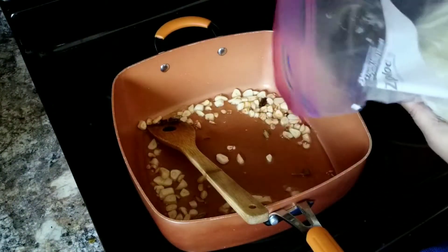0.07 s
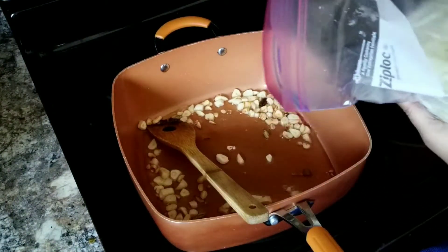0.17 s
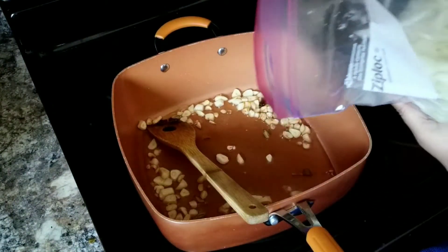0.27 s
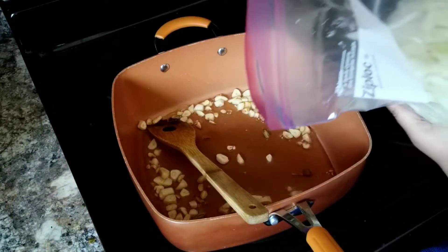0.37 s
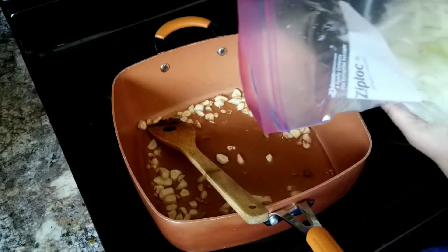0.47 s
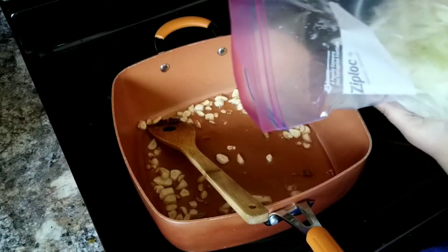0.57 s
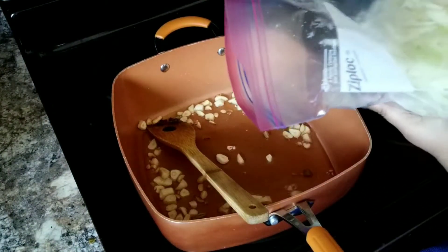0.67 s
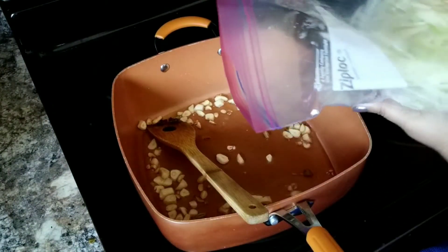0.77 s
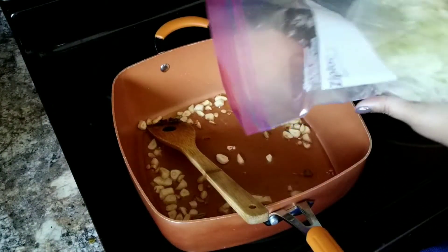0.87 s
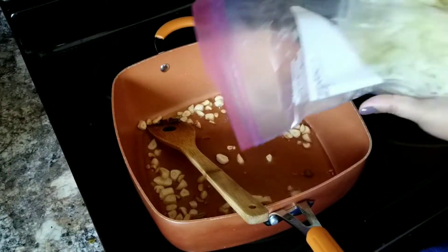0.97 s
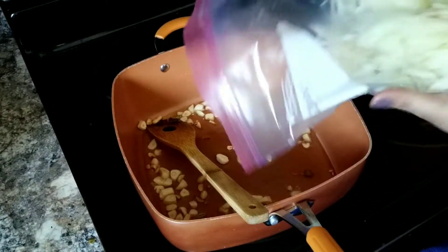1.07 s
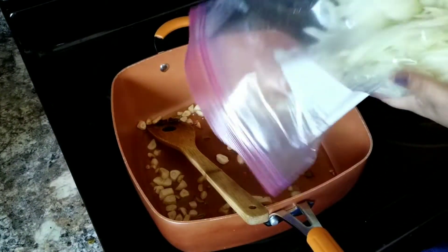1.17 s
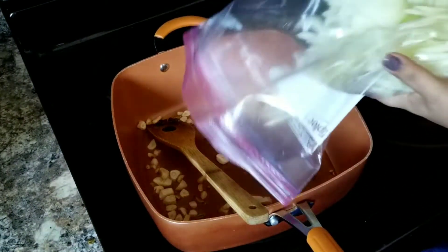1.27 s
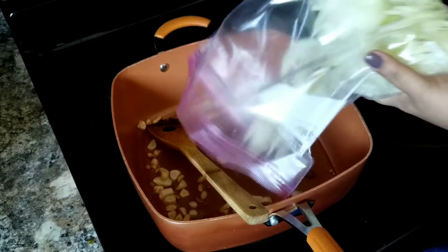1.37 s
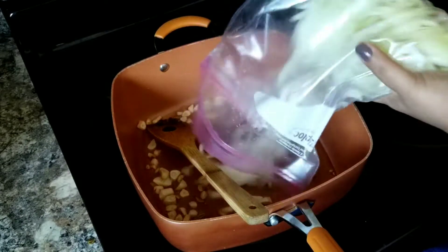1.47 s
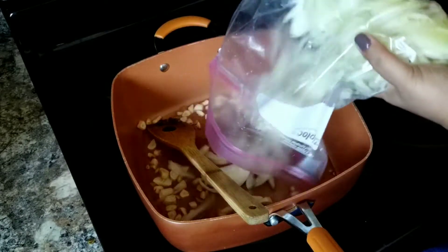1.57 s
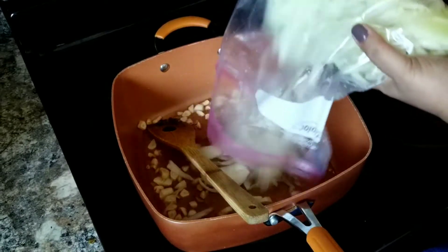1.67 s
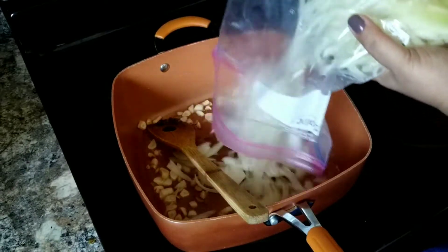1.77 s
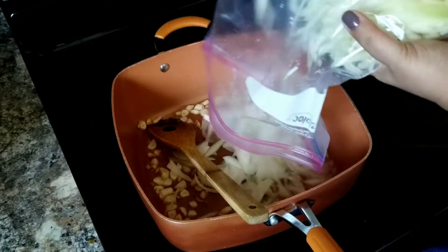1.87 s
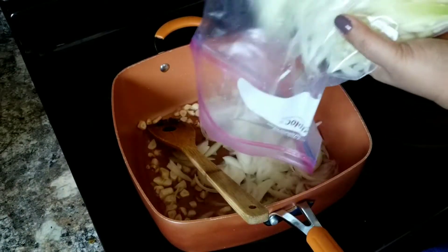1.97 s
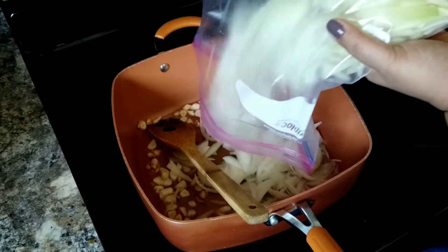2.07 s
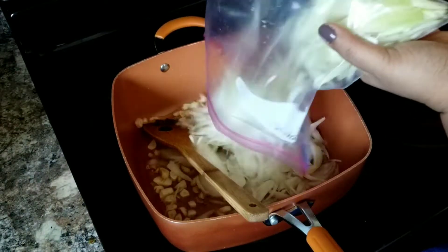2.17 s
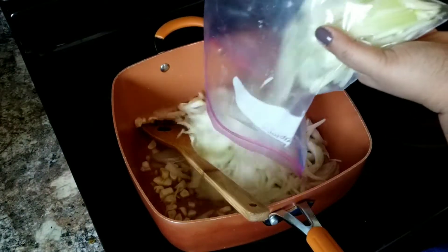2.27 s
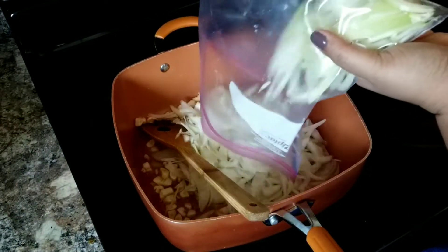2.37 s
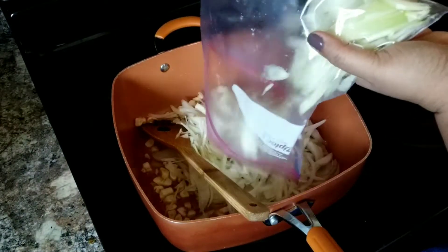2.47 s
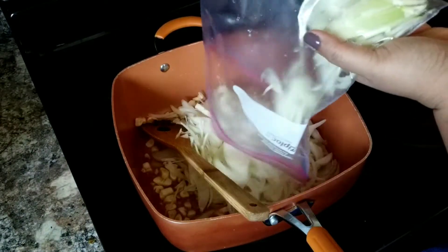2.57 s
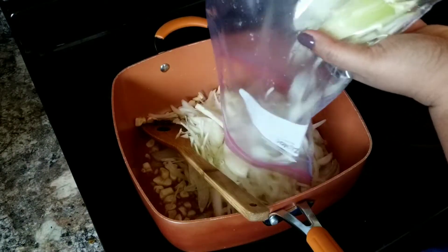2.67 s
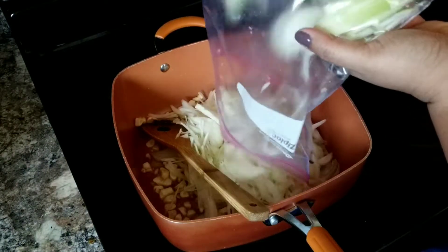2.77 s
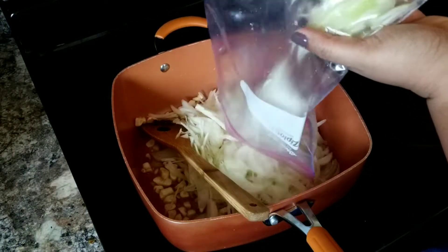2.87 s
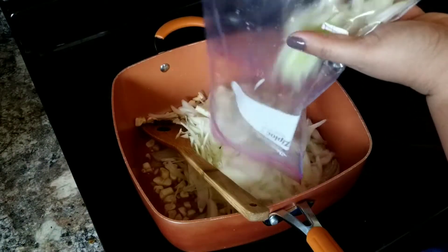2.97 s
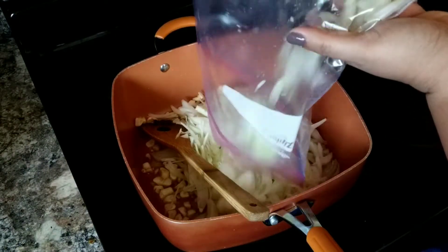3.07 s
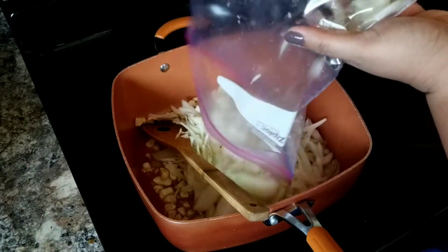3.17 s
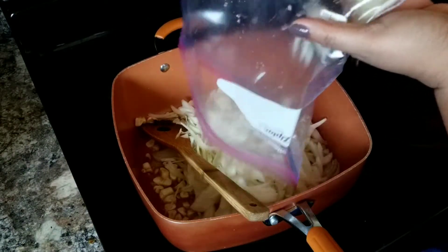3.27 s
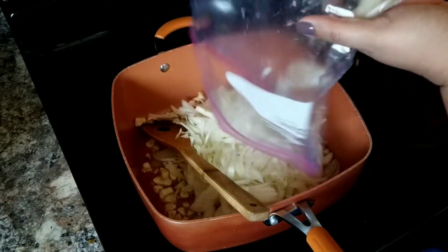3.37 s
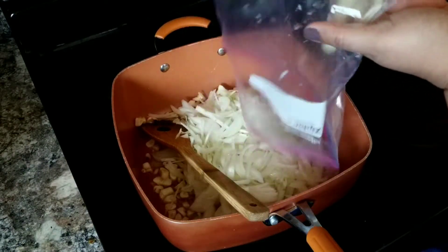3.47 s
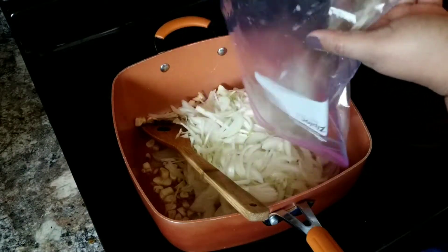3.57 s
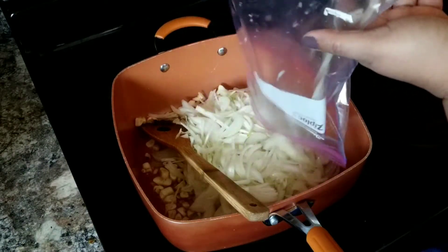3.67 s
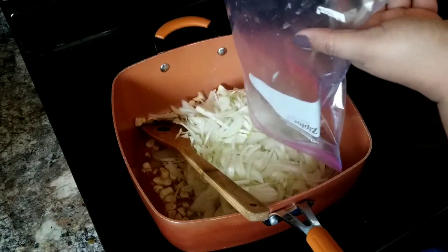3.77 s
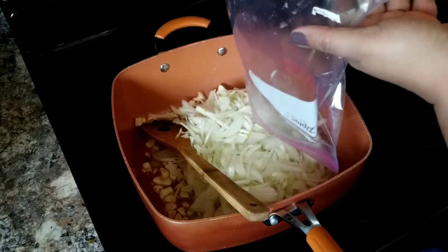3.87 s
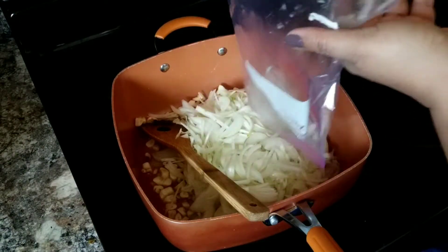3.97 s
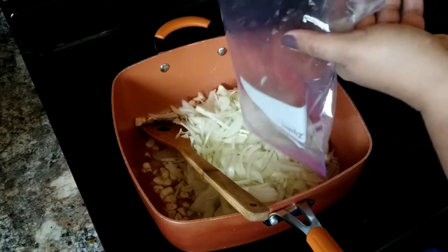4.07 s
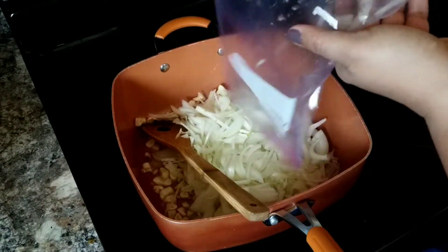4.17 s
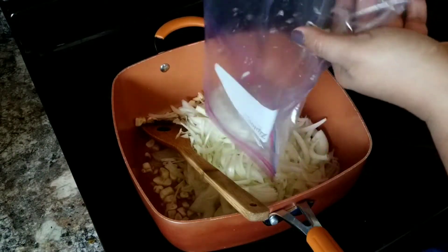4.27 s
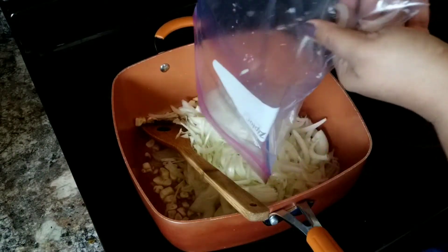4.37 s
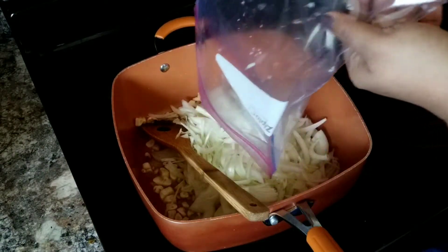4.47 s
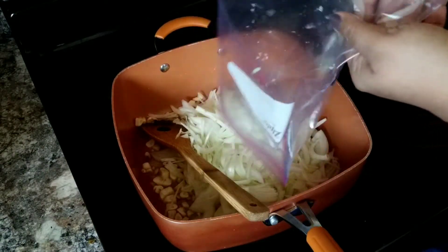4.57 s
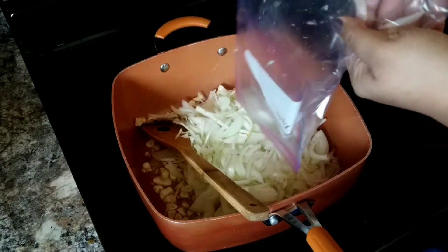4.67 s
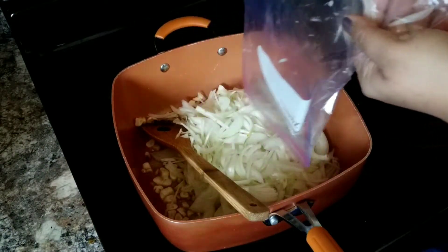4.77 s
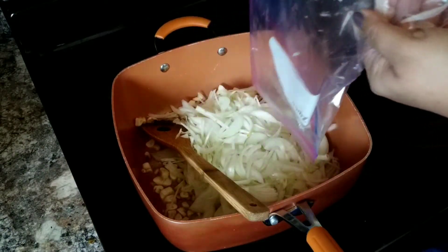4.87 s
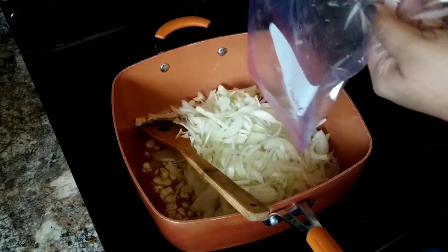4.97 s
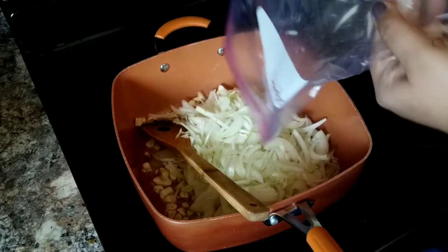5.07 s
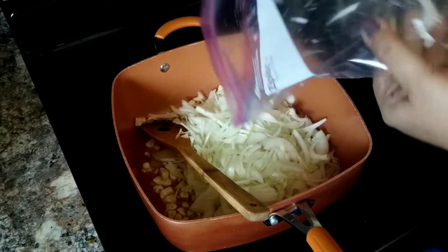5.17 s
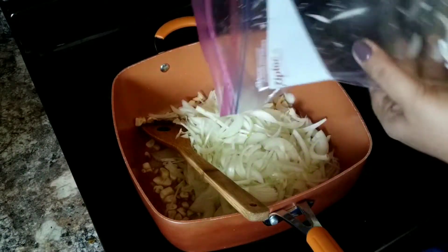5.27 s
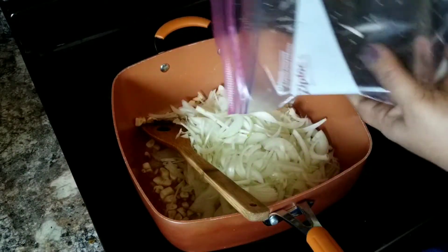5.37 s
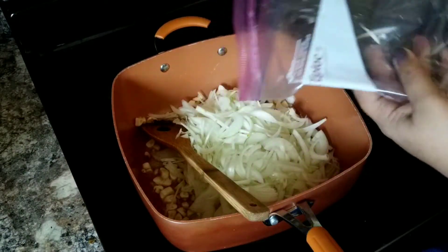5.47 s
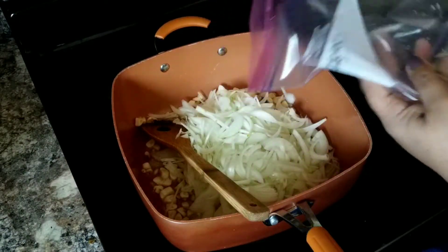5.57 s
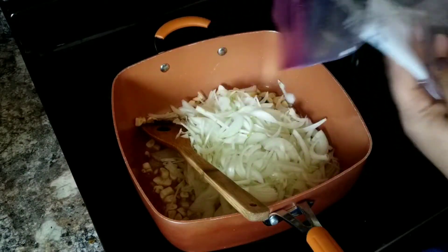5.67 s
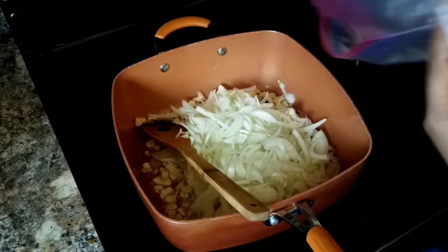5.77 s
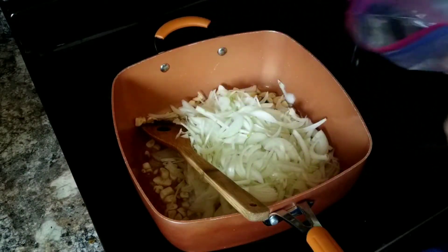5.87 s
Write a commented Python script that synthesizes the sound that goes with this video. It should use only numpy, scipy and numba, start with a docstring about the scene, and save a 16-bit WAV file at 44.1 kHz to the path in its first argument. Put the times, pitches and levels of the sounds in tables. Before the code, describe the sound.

A close, wide stereo phone recording in a small kitchen with a very short room tail. At first there is a quiet fine fizz of hot oil over a low, steady appliance hum and soft air. A plastic bag crinkles briefly at 0.1 seconds and again at 0.6 to 1.2, with wet slices shifting inside and one small spit at 1.0. From about 1.4 seconds clumps of onion land with soft, dull thuds; at 1.5 the oil flares into a short fierce hiss with dense, bright spits until 1.9. Another heavy clump drops at 2.2, with more spits around 2.1 and 2.5. The sizzle settles and sinks through 3 to 4.5 seconds while the bag is shaken, rustling and snapping. From 4.7 the level partly recovers: a last soft thud and scuff, then the loudest sharp film cracks at 5.0 to 5.35, and a final snap near 5.8 over steady sizzling.

```python
"""Onions into hot oil

Sliced onions are shaken from a plastic bag into a pan of hot oil, close to a phone in a small kitchen.
Swarms of tiny rings fizz and crackle as the oil, flare up as wet slices land, then settle to a sizzle.
Filtered ticks and noise bursts make the rustling bag and the spits; damped low sines make the thuds.
Sines and soft noise make a nearby appliance. All but the sharp snaps and spits sinks after the
first flare and partly comes back about three seconds later."""
import sys
import numpy as np
from scipy import signal
from scipy.fft import rfft, irfft, next_fast_len
from scipy.io import wavfile
from numba import njit

SR = 44100
rng = np.random.default_rng(int(sys.argv[2]) if len(sys.argv) > 2 else 0)


def generate_wav(signal):
    """Clip the signal to [-1, 1] and save it as 16-bit WAV at the path in sys.argv[1]."""
    frames = np.transpose(np.atleast_2d(signal))
    scaled = np.clip(frames, -1, 1) * 32767
    pcm = np.round(scaled).astype(np.int16)
    wavfile.write(sys.argv[1], SR, pcm)


N = 261513  # length in samples

# spectrum of crumpling plastic film: frequency_hz, level_db
FILM_SPECTRUM = [(1100, -11), (1500, -0.5), (2200, 0.5), (3500, -1.5), (7000, -17), (14000, -32)]
# spectrum of wet slices sliding on the film: frequency_hz, level_db
SLIDE_SPECTRUM = [(190, -7), (450, 3), (720, 2.5), (950, 6), (1080, 7.5), (1230, 0.5), (1600, -1),
                  (4000, -23)]
FLARE_RISE_S = 0.011


def undb(db):
    """Decibels to gain."""
    return 10 ** (np.asarray(db) / 20)


def unit(x):
    """Scale to rms 1."""
    return x / np.sqrt(np.mean(x ** 2))


def pan(db):
    """Channel gains for a left minus right level."""
    return undb(np.array([[db], [-db]]) / 2)


def add(out, s, sound):
    """Mix a stereo sound in at time s."""
    start = int(s * SR)
    out[:, start:start + sound.shape[1]] += sound[:, :N - start]


def swell(s, rise_s, hold_s, fall_s):
    """An envelope that rises from time s, holds until hold_s after it, then decays with time constant fall_s."""
    t = np.arange(N) / SR - s
    rise = np.clip(t / rise_s, 0, 1)
    return rise * np.exp(-np.maximum(t - hold_s, 0) / fall_s)


def colour(x, points):
    """Causal minimum-phase filter with the given (Hz, dB) outline, rolled off below its first point."""
    size = 2 * next_fast_len(x.shape[-1] // 2 + 2048, real=True)
    hz, db = np.transpose(points)
    f = np.maximum(np.fft.rfftfreq(size, 1 / SR), 1)
    low_cut = np.clip(f / hz[0], 1 / 20, 1) ** 2  # 12 dB an octave, down to a floor
    gain = undb(np.interp(np.log(f), np.log(hz), db)) * low_cut
    # folding the cepstrum onto positive times makes the filter causal
    cepstrum = irfft(np.log(gain), size)
    cepstrum[1:size // 2] *= 2
    cepstrum[size // 2 + 1:] = 0
    response = np.exp(rfft(cepstrum))
    return irfft(rfft(x, size) * response, size)[..., :x.shape[-1]]


@njit
def ring(start, hz, cycles, size):
    """Sum of damped sines, each of energy size squared and 60 dB down after its cycles."""
    out = np.zeros(N)
    for k in range(len(start)):
        fall = np.log(1000) * hz[k] / cycles[k] / SR
        step = -fall + 2j * np.pi * hz[k] / SR
        first = int(np.ceil(start[k] * SR))
        # begin between samples, at the exact start time
        z = size[k] * np.sqrt(4 * fall) * np.exp(step * (first - start[k] * SR))
        p = np.exp(step)
        for i in range(max(first, 0), min(first + int(7 / fall), N)):
            out[i] += z.imag
            z *= p
    return out


def grains(s, hz, cycles, size, pan_db, spread_s=.00012):
    """Tiny rings from scattered places: each reaches the two microphones at its own lag and given level."""
    settings = np.broadcast_arrays(s, hz, cycles, size, pan_db)
    s, hz, cycles, size, pan_db = (np.ravel(a) * 1. for a in settings)
    lag = spread_s * (0.39 + rng.standard_normal(len(s)))
    hz = np.clip(hz, 50, .42 * SR)
    cycles = np.maximum(cycles, .5)
    left = ring(s - lag / 2, hz, cycles, size * undb(pan_db / 2))
    right = ring(s + lag / 2, hz, cycles, size * undb(-pan_db / 2))
    return np.array([left, right])


def swarm(count, low_hz, high_hz, cycles, scatter_db, width_db):
    """Countless bursts at random moments, most of them tiny and a few strong."""
    when, pitch, length, strength, place = rng.random((count, 5)).T
    size = undb(-scatter_db * np.log(.001 + .999 * strength))
    hz = low_hz + (high_hz - low_hz) * pitch
    return grains(when * N / SR, hz, cycles * (.5 + length), size, width_db * (place - .5))


def wash(x, t60, db):
    """Reflections of bursts from ever new places blur into a hiss that follows their energy."""
    keep = np.exp(-2 * np.log(1000) / t60 / SR)
    energy = signal.lfilter([1 - keep], [1, -keep], np.mean(x ** 2, axis=0))
    return x + undb(db) * np.sqrt(energy) * rng.standard_normal(x.shape)


def flurries(count, t60, depth):
    """Bursts come in bunches: sudden surges of activity begin to die away at once."""
    when, strength = rng.random((count, 2)).T
    kicks = np.bincount((when * N).astype(int), strength, N)
    surge = signal.lfilter([1], [1, -np.exp(-np.log(1000) / t60 / SR)], kicks)
    return unit(1 + depth * unit(surge))


def snap(outline, tail_outline, break_s, tail_db, tail_s):
    """A sudden break of unit energy, plus a scatter tail_db relative to it that dies more slowly."""
    t = np.arange(SR // 8) / SR
    first, scatter = rng.standard_normal((2, 2, len(t)))
    first = first.mean(axis=0) + 0.29 * (first - first[::-1])  # partly alike at the two microphones
    first = unit(colour(first * np.exp(-t / break_s), outline))
    scatter = unit(colour(scatter * np.exp(-t / tail_s), tail_outline))
    return (first + undb(tail_db) * scatter) / np.sqrt(len(t))


def kitchen(x, wall_db, width):
    """The short tail of the room: decaying noise, mostly alike at both microphones when width is small."""
    t60_s = 0.16
    t = np.arange(SR // 2) / SR
    decay = np.exp(-np.log(1000) * t / t60_s) * (t > .003)
    mid, side = rng.standard_normal((2, len(t))) * decay
    tail = np.array([mid + width * side, mid - width * side])
    tail /= np.sqrt(np.sum(tail ** 2) / 2)
    return x + undb(wall_db) * signal.fftconvolve(x, tail, axes=1)[:, :N]


def boiling(oil_db, heap_db, flare_db, lag_s):
    """Strength of the bubbling: the bare oil, the heap from the first landing on, and each load's flare."""
    # loads of wet slices reach the oil and flare up: start_s, level_db, decay_time_constant_s
    loads = [(1.495, -28.5, 5.4), (1.52, -50, 0.096), (1.734, -30, 2.5), (2.2, -26, 0.27)]
    heap = undb(heap_db) * swell(loads[0][0] + lag_s, FLARE_RISE_S, N / SR, 1)
    power = undb(oil_db) ** 2 + heap ** 2
    for s, db, fall_s in loads:
        flare = undb(db + flare_db) * swell(s + lag_s, FLARE_RISE_S, FLARE_RISE_S, fall_s)
        power = power + flare ** 2
    return np.sqrt(power)


def frying():
    """Steam bubbles burst in the oil: very small ones fizz, larger ones crackle lower."""
    # spectrum of the fine fizz: frequency_hz, level_db
    fizz_spectrum = [(6500, -1.5), (8600, -7.5), (11000, -2), (13500, -4), (16000, -1)]
    # spectrum of the larger bubbles: frequency_hz, level_db
    crackle_spectrum = [(1800, -5), (2700, 3.5), (3600, 5), (5500, 4.5), (7100, 4), (8500, -6.5),
                        (12000, -35)]
    fizz_gain = boiling(oil_db=-40.5, heap_db=-38, flare_db=0, lag_s=0)
    # larger bubbles form later, and a flare drives them less than the fizz
    crackle_gain = boiling(oil_db=-47, heap_db=-35, flare_db=-4, lag_s=0.015)
    fizz = swarm(count=50000, low_hz=6980, high_hz=16800, cycles=26, scatter_db=2.0, width_db=32)
    crackle = swarm(count=36000, low_hz=1455, high_hz=8850, cycles=17.7, scatter_db=2.0, width_db=15.5)
    fizz = unit(colour(wash(fizz, t60=.08, db=0), fizz_spectrum))
    crackle = unit(colour(wash(crackle, t60=.08, db=0), crackle_spectrum)) * pan(0.85)
    sizzle = fizz_gain * fizz + crackle_gain * crackle
    return sizzle * flurries(count=500, t60=0.094, depth=0.17)


def appliance():
    """Mains harmonics and motor tones that waver slightly in phase, over a soft rush of air."""
    # tones of the hum: frequency_hz, level_db
    tones = [(120, -58.5), (180, -62), (240, -60.5), (300, -60), (354, -68.5), (431, -69)]
    # spectrum of the air: frequency_hz, level_db
    air_spectrum = [(20, -1), (60, 1), (85, 1), (140, 3.5), (220, 6), (330, -4), (600, -17), (1500, -7),
                    (6000, -22.5)]
    air_db, air_side_db = -55.5, -11.5  # side level is relative to the middle
    t = np.arange(N) / SR
    hum = 0
    for hz, db in tones:
        knots = np.arange(0, t[-1] + 1, 1 / 6)
        waver = np.interp(t, knots, rng.standard_normal(len(knots)))
        phase = 2 * np.pi * (hz * t + rng.random()) + 0.35 * waver
        hum = hum + np.sqrt(2) * undb(db) * np.sin(phase)
    mid, side = unit(colour(rng.standard_normal((2, N)), air_spectrum))
    air = undb(air_db) * (mid + undb(air_side_db) * np.array([[1], [-1]]) * side)
    return hum * pan(-2.4) + air


def bag_motion():
    """Strength of the crumpling and of the sliding: each move starts quickly, lasts a while and settles."""
    # lift, tip, pour, shake out, take away: start_s, length_s, film_level_db, slide_level_db
    moves = [(0.025, 0.018, -51.5, -54.5), (0.584, 0.2, -55.5, -58.5), (0.778, 0.037, -45.5, -50),
             (0.985, 0.19, -53, -51.5), (1.392, 0.065, -42, -46.5), (1.712, 1.66, -39.5, -50.5),
             (3.208, 0.35, -40.5, -50.5), (3.597, 1.04, -42, -53.5), (4.695, 0.051, -40, -52),
             (4.96, 0.98, -39, -51.5)]
    rise_s, settle_s = 0.021, 0.2
    held_db = (-66, -61.5)  # film and slices while the bag is only held
    power = undb(held_db)[:, None] ** 2
    for s, length_s, *levels_db in moves:
        move = undb(levels_db)[:, None] * swell(s, rise_s, length_s, settle_s)
        power = power + move ** 2
    return np.sqrt(power)


def handling(film_gain, slide_gain):
    """The film crumples in jerks of small ticks while wet slices rub and tumble more evenly inside it."""
    ticks = swarm(count=7000, low_hz=1210, high_hz=4630, cycles=4.0, scatter_db=1.5, width_db=-6)
    film = unit(colour(wash(ticks, t60=0.12, db=1.0), FILM_SPECTRUM))
    tumbles = swarm(count=9000, low_hz=150, high_hz=1670, cycles=1.9, scatter_db=1.3, width_db=20.5)
    slide = unit(colour(tumbles, SLIDE_SPECTRUM))
    jerks = flurries(count=400, t60=0.024, depth=0.42)
    sliding = slide_gain * np.sqrt(np.abs(jerks)) * slide  # the root evens out the jerks
    return film_gain * jerks * film + kitchen(sliding, wall_db=-6.0, width=0.67)


def small_creases(film_gain, count):
    """Lesser folds give way at random, as strongly as the bag is being crumpled: rows for creases()."""
    above_rustle_db, spread_db = 9, 6
    low_hz, high_hz = 1760, 5530
    when, strength, pitch, share = rng.random((count, 4)).T
    rustle_db = 20 * np.log10(film_gain[(when * N).astype(int)])
    db = rustle_db + above_rustle_db + spread_db * (strength - .5)
    hz = low_hz * (high_hz / low_hz) ** pitch
    return np.column_stack([when * N / SR, db, hz, share / 2])


def creases(rows):
    """Folds of the bag buckle one by one; each panel of film cracks and rings very briefly."""
    # spectrum of one snap: multiple_of_its_pitch, level_db
    crack_shape = [(.35, -4.5), (.65, 1), (1, 2.5), (1.7, -2.5), (2.6, -8), (9, -8.5)]
    # spectrum over all snaps: frequency_hz, level_db
    top_spectrum = [(300, -4), (7000, 1.5), (8700, -1), (15000, -4)]
    snap_db = 14.5  # energy of a snap relative to its nominal peak
    s, db, hz, share = np.transpose(rows)
    share = np.clip(share, 0, 1)
    size = undb(db + snap_db)
    out = grains(s, hz, 20, size * np.sqrt(share), 0, spread_s=.00003)
    for start, crack_size, pitch in zip(s, size * np.sqrt(1 - share), hz):
        outline = [(pitch * multiple, gain) for multiple, gain in crack_shape]
        crack = snap(outline, outline, break_s=.0011, tail_db=-6, tail_s=0.0086)
        add(out, start, crack_size * crack)
    return kitchen(colour(out, top_spectrum), wall_db=-4, width=0.34)


def rub(rise_s, crinkle_db):
    """A soft swell: slices scuff the film with unit energy, and it crinkles along."""
    t = np.arange(SR // 4) / SR
    mid, side, ticks = rng.standard_normal((3, len(t))) * t * np.exp(-t / rise_s)
    scuff = unit(colour(mid + 0.21 * side * np.array([[1], [-1]]), SLIDE_SPECTRUM))
    sparse = rng.standard_normal((2, len(t))) ** 3  # cubing leaves a few strong ticks
    crinkle = unit(colour(ticks * sparse, FILM_SPECTRUM))
    return (scuff + undb(crinkle_db) * crinkle) / np.sqrt(len(t))


def clumps():
    """Each clump lands as a few soft blows (a first slice, the bulk, then stragglers) and rubs along the film."""
    # clumps dropping: start_s, energy_of_main_blow_db, pitch_hz, rub_energy_db
    drops = [(0.808, -21.5, 353, -32), (1.428, -16, 182, -23), (1.513, -14, 345, -22),
             (1.675, -13.5, 440, -15.5), (2.197, -5.5, 450, -20), (2.52, -15, 457, -35),
             (2.659, -18, 181, -25), (3.069, -14, 191, -31), (4.73, -14, 180, -12)]
    blow_gap_s, blow_step_db = .011, -8  # the step is per place away from the bulk
    s, db, hz, _ = np.transpose(drops)[:, :, None]
    order = np.arange(4)
    wait, detune = rng.random((2, len(s), len(order))) - .5
    when = s + blow_gap_s * order * (1 + wait / 2)
    sizes = undb(db + blow_step_db * np.abs(order - 1))
    blows = grains(when, hz * 2 ** (0.17 * detune), 11, sizes, 0)
    out = signal.sosfilt(signal.butter(2, 150, "high", fs=SR, output="sos"), blows)
    for start, _, _, rub_db in drops:
        add(out, start - .01, undb(rub_db) * rub(rise_s=0.014, crinkle_db=-18))
    return kitchen(out, wall_db=-5, width=0.3)


def spits():
    """Drops of water explode in the oil, each followed by a short, bright hiss of steam."""
    # water spitting: start_s, energy_db, treble_tilt_db (above 8 kHz, before the energy is set)
    drops = [(1.034, -12, -3), (1.494, -5, 7), (1.552, 2.5, 7), (1.5826, 6, 16), (1.6265, 2.5, -8),
             (1.7758, -2, 2), (1.8001, -5.5, 4), (1.9161, -0.5, -4), (2.1425, 4.5, -7.5), (2.5226, 3.5, 9),
             (2.714, -10, 2), (3.345, -5, 2), (3.5568, -2.5, 10), (5.059, -4.5, 7), (5.2705, -14, 0),
             (5.5413, -2.5, 5)]
    # spectrum of the explosion: frequency_hz, level_db
    crack_spectrum = [(1800, 0.78), (3500, 3.5), (6500, 9.7), (8700, 6.4), (11500, 6.9), (15500, 10)]
    # spectrum of the steam: frequency_hz, level_db
    steam_spectrum = [(3400, 2.5), (5500, 12.5), (7000, 10), (8700, -3), (11500, 9.5), (15500, -4)]
    out = np.zeros((2, N))
    for s, db, treble_db in drops:
        crack = [(hz, gain + treble_db * (hz > 8000)) for hz, gain in crack_spectrum]
        hiss = [(hz, gain + treble_db * (hz > 8000)) for hz, gain in steam_spectrum]
        spit = snap(crack, hiss, break_s=0.00045, tail_db=-2.5, tail_s=0.0079)
        add(out, s, undb(db) * spit)
    return kitchen(out, wall_db=-5.0, width=0.41)


def scald():
    """The water on the first slices boils off all at once in a short, fierce hiss."""
    # spectrum of the hiss: frequency_hz, level_db
    hiss_spectrum = [(4000, -1), (5900, 8), (8500, -34)]
    steam = unit(colour(rng.standard_normal((2, N)), hiss_spectrum))
    return undb(-28.5) * swell(1.544, FLARE_RISE_S, hold_s=.04, fall_s=.028) * steam


def scene():
    """Everything at the stove; the sharp snaps and spits stand out over the dip in level."""
    # the level sinks for a while and partly comes back: time_s, level_db
    dip_points = [(1.5, 0), (1.95, -4.5), (3.5, -6), (4.0, -8), (4.55, -8.5), (4.678, -3)]
    # sharpest creases: start_s, nominal_peak_db, pitch_hz, ring_share (0-1, the rest is dry crack)
    sharp_creases = [(0.0675, -29.5, 1190, 0.1), (0.614, -30.5, 1780, 0.18), (0.8062, -25.5, 1250, 0.4),
                     (0.843, -29, 2300, 0.1), (0.8585, -25, 1090, 0.12), (1.1545, -30, 2030, 0.4),
                     (2.0806, -22.5, 3450, 0.4), (2.1045, -20.5, 3760, 0), (2.1569, -25.5, 2260, 0.7),
                     (2.2244, -20.5, 3800, 0.4), (2.5315, -26.5, 1100, 0.2), (2.7748, -25, 3600, 0.2),
                     (3.1553, -21, 2570, 0.2), (3.2377, -21.5, 2120, 0.2), (3.2473, -31, 2050, 1),
                     (3.2743, -29, 3900, 0.3), (3.289, -27.5, 2600, .2), (3.2976, -29, 3500, 0.5),
                     (3.3445, -22, 2300, 0.1), (3.4129, -24.5, 3860, 0.8), (3.6726, -22.5, 2950, 0),
                     (3.7618, -29, 7500, 1), (3.8685, -25, 2870, 0), (3.8765, -28, 3140, 0.32),
                     (4.1159, -20, 4830, 0.1), (4.2366, -20.5, 5300, 0.2), (4.3174, -29.5, 2170, 0.6),
                     (4.6293, -25.5, 5600, 0.7), (4.8305, -24, 4640, 0.1), (4.8429, -21, 3350, 0.75),
                     (4.8746, -27.5, 1700, 0.6), (4.9765, -24, 2480, 0.2), (4.9899, -23.5, 3290, 0.2),
                     (5.014, -25.5, 2050, 0.4), (5.1018, -20, 2830, 0.3), (5.1785, -18, 5460, 0.45),
                     (5.2044, -15.5, 2970, 0.02), (5.2054, -20, 1770, 0.74), (5.2515, -23, 4300, 0.06),
                     (5.3062, -17, 2950, 0), (5.3411, -26.5, 2280, 0.6), (5.6558, -21, 1480, 0.77),
                     (5.7877, -18, 4760, 0.14)]
    dip = undb(np.interp(np.arange(N) / SR, *np.transpose(dip_points)))
    film_gain, slide_gain = bag_motion()
    bed = frying() + appliance() + handling(film_gain, slide_gain) + clumps() + scald()
    folds = np.vstack([sharp_creases, small_creases(dip * film_gain, count=55)])
    return dip * bed + creases(folds) + spits()


def record(dry):
    """The phone cuts the top with a steep low-pass at 15.7 kHz."""
    return signal.sosfilt(signal.ellip(10, .2, 75, 15700, fs=SR, output="sos"), dry)


dry = scene()
out = record(dry)
generate_wav(out)
```